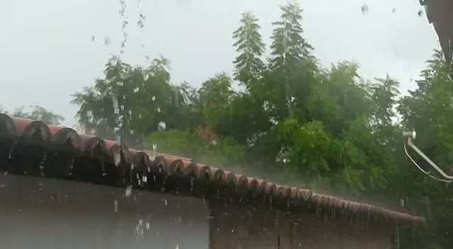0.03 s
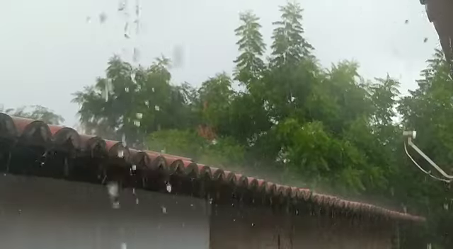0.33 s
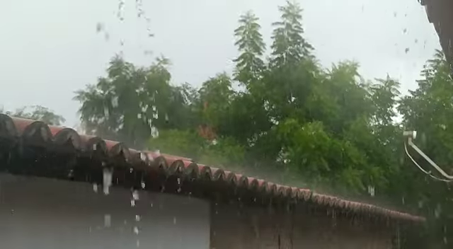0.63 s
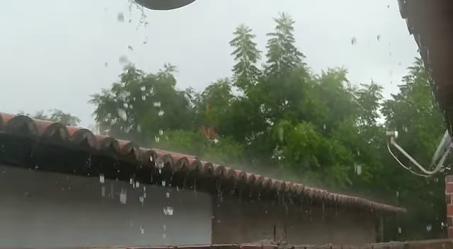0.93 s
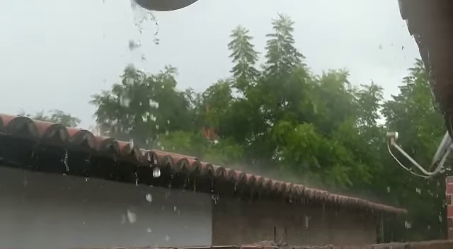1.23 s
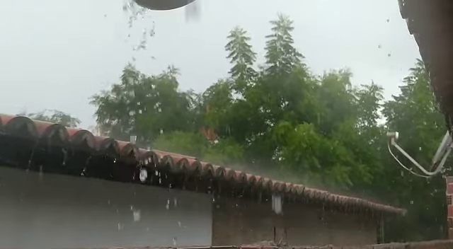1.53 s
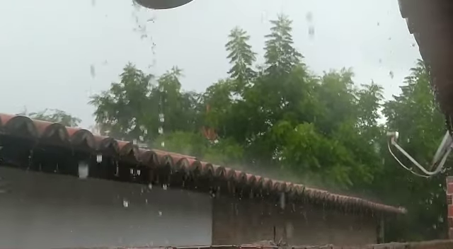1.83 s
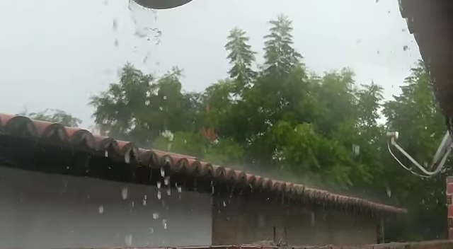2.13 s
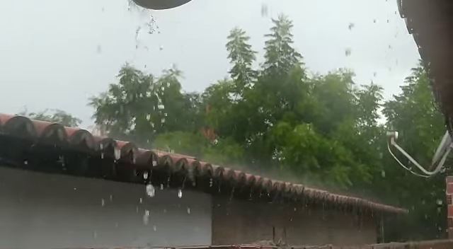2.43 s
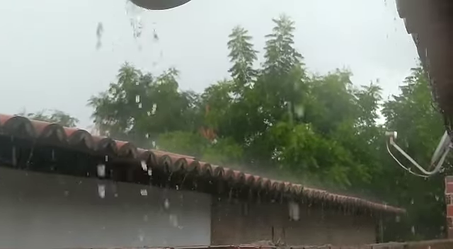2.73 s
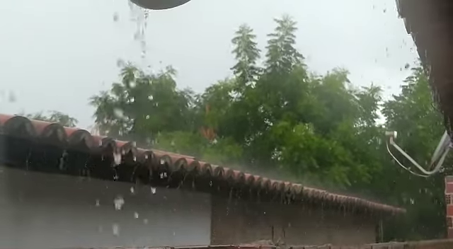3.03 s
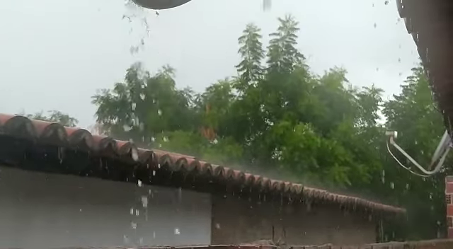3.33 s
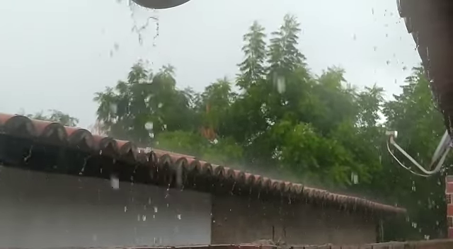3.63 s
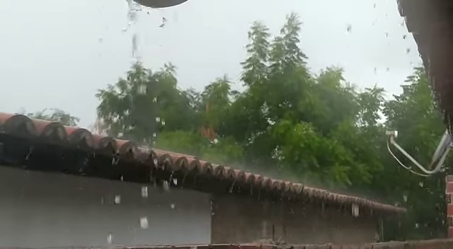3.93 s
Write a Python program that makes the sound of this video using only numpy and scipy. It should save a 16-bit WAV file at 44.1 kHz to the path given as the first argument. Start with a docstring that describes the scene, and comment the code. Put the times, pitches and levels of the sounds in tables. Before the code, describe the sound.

A steady downpour washes over clay tile roofs, heard from shelter beneath the eaves. Close to the microphone, big drops of runoff keep splattering on the wet ground and landing in puddles as the rain eases and swells slightly.

```python
"""Heavy rain from under the eaves of a tiled roof, heard by two spaced microphones bright near 8.5 kHz.
After a third of a second of silence the rain cuts in: countless far impacts merge into a wash, nearer
ones patter and tick, roofs drum at their resonances and tiny bubbles ring. From just after that to the
end, gobs of runoff smack on wet ground and burst into spray, or plop into puddles. The rain eases near
1.3 s and is strongest near 3.25 s; moving air rumbles faintly beneath it."""
import sys
import numpy as np
from scipy import signal
from scipy.fft import rfft, irfft, next_fast_len
from scipy.io import wavfile

SR = 44100
rng = np.random.default_rng(int(sys.argv[2]) if len(sys.argv) > 2 else 0)


def inscribe(sig):
    """Save sig as 16-bit PCM at rate SR to the path in sys.argv[1].

    A 1-D sig is mono; a 2-D sig holds one channel per row.
    Samples are clipped to [-1, 1] before scaling.
    """
    pcm = np.round(np.clip(np.atleast_2d(sig).T, -1, 1) * 32767)
    wavfile.write(sys.argv[1], SR, pcm.astype(np.int16))


N = 176400
TIME = np.arange(N) / SR

# Large gobs striking the ground. Each row: start in seconds, spray level in dB, slap level in dB,
# slap frequency in Hz, rise time in seconds, left minus right level in dB.
GROUND_GOBS = [(.438, -22, -31, 4500, 0.0045, -2), (.682, -19.5, -34, 3480, .0007, -1),
               (.745, -38, -25, 4300, .0034, -1), (.886, -45, -26.5, 2740, 0.0037, 0),
               (.9455, -17.5, -19.5, 4600, 0.0026, 1), (.998, -18.5, -45, 2500, .0011, 0),
               (1.049, -19.5, -32, 5200, .0028, 0), (1.205, -30, -30, 4300, 0.0034, 0),
               (1.388, -24, -25, 4280, 0.0033, 2), (1.415, -38, -25, 4550, 0.0031, -3),
               (1.46, -25, -24, 3000, 0.012, 1), (1.598, -17, -19, 3300, 0.0031, -1.5),
               (1.923, -35, -23.5, 4300, 0.0021, 1), (1.986, -24, -31, 4500, 0.0036, 1),
               (2.023, -23, -24, 3700, 0.0032, -1), (2.095, -22, -30, 3100, 0.0039, -1),
               (2.205, -32, -31, 3320, 0.0096, -3), (2.345, -20.5, -26.5, 2880, 0.0067, 0),
               (2.39, -20.5, -25.5, 4450, 0.0036, 1), (2.502, -21.5, -38, 4500, .001, -1),
               (2.545, -25, -32, 4500, .003, -2), (2.649, -22, -41, 2780, 0.0046, 0),
               (2.757, -25, -25, 4030, .006, 0), (2.888, -36, -26.5, 3650, 0.0037, 0),
               (2.9703, -25, -17.5, 5340, 0.00059, 3), (2.986, -25, -28, 5000, 0.0035, 5),
               (3.008, -23, -23.5, 3300, 0.0061, 3), (3.158, -24, -23, 2630, 0.0085, -1),
               (3.271, -19.5, -25.5, 4900, 0.0034, 0), (3.315, -34, -22, 2950, 0.003, 1.5),
               (3.35, -33, -31, 3900, .004, 0), (3.509, -21.5, -20.5, 2270, 0.0065, -1),
               (3.535, -22, -17, 4500, 0.0017, 1.5), (3.563, -28, -25, 4950, 0.003, 1),
               (3.621, -18, -31, 5200, 0.0099, 1), (3.763, -21.5, -27.5, 2580, 0.0018, 0),
               (3.872, -20, -27, 2390, 0.005, 0), (3.934, -15.5, -25, 3570, 0.0043, 1)]
# Gobs landing in puddles. Each row: start in seconds, level in dB, centre frequency in Hz.
PUDDLE_GOBS = [(.474, -19.5, 1250), (.53, -25.5, 730), (.942, -28, 1200), (1.032, -22, 860),
               (1.065, -26.5, 520), (1.215, -24.5, 670), (1.456, -26, 1190), (1.59, -30, 910),
               (1.875, -29, 820), (2.087, -36, 1300), (2.352, -25, 1140), (2.408, -23.5, 1340),
               (2.465, -25, 1110), (2.545, -23, 660), (2.595, -27, 500), (2.645, -29, 1320),
               (2.785, -24, 1010), (2.822, -24.5, 1200), (2.862, -23.5, 1280), (3.061, -25, 1520),
               (3.155, -24, 1090), (3.182, -22.5, 1070), (3.214, -26, 1000), (3.318, -29, 1400),
               (3.505, -27, 715)]
# Strength of the rain and the lesser runoff. Each row: time in seconds, gain in dB.
RAIN_STRENGTH = [(.35, 0.5), (.5, 1.5), (.63, -0.5), (.8, 2), (1.05, -1), (1.3, -3), (1.5, 1.5), (1.72, 0),
                 (2.2, 0), (2.4, 1), (2.62, -0.5), (2.73, -1), (2.85, 0.5), (3.0, -0.5), (3.25, 2.5),
                 (3.5, 1.5), (3.7, -2), (4, -1.5)]
# Spectra of the far, nearer and closest drops. Each row: frequency in Hz, relative level in dB.
WASH_SPECTRUM = [(25, -12), (60, -9), (130, -9), (200, -4), (320, -2), (600, -5), (900, -3), (1150, -3),
                 (2000, -5), (3500, -8.5), (6000, -8), (10000, -5), (15500, -20)]
PATTER_SPECTRUM = [(60, -14.5), (150, -4), (280, 2), (550, 4), (850, 2), (1150, -6.5), (1800, 0.5),
                   (3000, -11.5), (6000, -26), (15500, -3)]
TICK_SPECTRUM = [(300, -17), (1500, 7.5), (3000, -12), (6000, -23), (9500, 4), (12000, -12), (15500, -7)]
# Normal modes of the roofs. Each row: frequency in Hz, bandwidth in Hz, level in dB.
ROOF_RESONANCES = [(88.8, 8.8, -46.5), (143.7, 13, -50.5), (182.3, 18.6, -46.5), (249.7, 23, -45.5),
                   (296.6, 20, -43.5), (365, 7.2, -45.5), (499, 105, -41), (730.6, 24, -44),
                   (867, 58, -40.5), (1102, 22, -52), (1560, 13, -45.5), (1757, 45, -46.5), (2593, 66, -45)]
# Swell of the lowest roof mode. Each row: time in seconds, gain in dB.
LOWEST_MODE_SWELL = [(.4, 0.5), (.8, -3.5), (1.25, 1.5), (1.6, -10), (2.1, 4), (2.4, -1), (2.9, 4.5),
                     (3.3, -3), (3.7, -2.5)]
# Spectrum of air moving over the microphones. Each row: frequency in Hz, relative level in dB.
DRAUGHT_SPECTRUM = [(20, 3), (45, 4), (90, -7), (160, -13), (300, -25), (1000, -41)]
# Balance curve, of which each side takes a share. Each row: frequency in Hz, leftward bias in dB.
LEFT_BIAS = [(60, 4.5), (130, 0), (300, 3), (700, 3), (2500, 1), (5000, 1), (8500, -2.7), (15000, -2)]
# Frequency response of the microphones. Each row: frequency in Hz, gain in dB.
MICROPHONE_RESPONSE = [(4000, 2.5), (6000, 2.5), (7300, 4), (8500, 8), (9400, 5), (10400, -5),
                       (12000, -4.5), (15000, -8)]

MIC_DELAY_S = .00044  # longest travel time between the two microphones
SPRAY_Q, SLAP_Q, BROAD_Q = 1.76, 1.2, 0.61
SPRAY_HZ, SMACK_HZ = 9050, 5720
HARD_SLAP_DB, HARD_SMACK_DB = -17.5, -22  # slap and smack of a hard gob


def runoff(gobs, fall_s):
    """Impact of a liquid on a solid: each gob smacks the ground, slaps outward and breaks into spray."""
    out = np.zeros((2, N))
    for start_s, spray_db, slap_db, slap_hz, rise_s, pan_db in gobs:
        hardness_db = slap_db - HARD_SLAP_DB
        own_fall_s = fall_s * from_db(-max(hardness_db, 0))  # the hardest spend their water sooner
        smack = splash(SMACK_HZ, BROAD_Q, rise_s, fall_s=0.01, per_s=5600, tail_share=0)
        smack *= from_db(HARD_SMACK_DB + hardness_db)
        spray = from_db(spray_db) * splash(SPRAY_HZ, SPRAY_Q, rise_s, own_fall_s, per_s=4500)
        slap = from_db(slap_db) * splash(slap_hz, SLAP_Q, rise_s, own_fall_s, per_s=6000)
        add(out, start_s, from_db([[pan_db / 2], [-pan_db / 2]]) * (smack + spray + slap))
    return low_pass(out, hz=13000)


def lesser_gobs(count=150, per_s=26, spray_db=-27.5, slap_db=-31.5, spread_db=3,
                slap_hz=3280, spread_octaves=0.71, rise_s=0.011):
    """Random scatter in timing, force and pitch gives the lesser gobs, in rows like GROUND_GOBS."""
    starts = np.cumsum(rng.uniform(.1, 1.9, count)) / per_s
    return [(start_s, spray_db + spread_db * force, slap_db + spread_db * (force + slap) / 2,
             slap_hz * 2 ** (spread_octaves * pitch), rise_s, pan_db)
            for start_s, (force, slap, pitch, pan_db) in zip(starts, rng.standard_normal((count, 4)))]


def puddles():
    """Impact on standing water: the splash is duller, its energy lying at lower frequencies."""
    out = np.zeros((2, N))
    for start_s, db, hz in PUDDLE_GOBS:
        add(out, start_s, from_db(db) * splash(hz, BROAD_Q, rise_s=0.0032, fall_s=0.045, per_s=1800))
    return low_pass(out, hz=3460)


def splash(hz, q, rise_s, fall_s, per_s, tail_share=0.47, tail_s=0.036):
    """Impulse excitation: a burst of droplets drives a broad band and a damped hollow near its pitch."""
    t = TIME[:SR // 6]
    droplets = drops(per_s, spread_db=-1.0, size=len(t))
    since_peak = np.maximum(t - rise_s, 0)
    fall = (1 - tail_share) * np.exp(-since_peak / fall_s)
    tail = tail_share * np.exp(-since_peak / tail_s)  # droplets landing again
    envelope = np.minimum(t / rise_s, 1) * (fall + tail)
    hollow_hz = hz * 2 ** (0.37 * rng.uniform(-1.05, 1))
    hollow = from_db(-5) * resonate(droplets, hollow_hz, q=9.9)
    return envelope * rms_one(resonate(droplets, hz, q) + hollow)


def rain(wash_swing_share=0.85):
    """Superposition: dense far impacts fuse into noise; sparser near drops and gobs stay distinct."""
    strength = from_db(np.interp(TIME, *np.transpose(RAIN_STRENGTH)))
    wash = from_db(-27) * shower(WASH_SPECTRUM, per_s=25000, spread_db=2.5)
    patter = from_db(-31) * shower(PATTER_SPECTRUM, per_s=1500, spread_db=4.0)
    ticks = from_db(-38.5) * shower(TICK_SPECTRUM, per_s=700, spread_db=10.0)
    lesser_runoff = runoff(lesser_gobs(), fall_s=0.028)
    return strength ** wash_swing_share * wash + strength * (patter + ticks + lesser_runoff)


def shower(spectrum, per_s, spread_db):
    """Shot noise: a random stream of like impacts has the spectrum of a single one; unit power."""
    return rms_one(colour(drops(per_s, spread_db), spectrum))


def drops(per_s, spread_db, size=N):
    """Poisson impacts from all sides reach the two microphones at unequal times and levels; unit power."""
    hits = np.flatnonzero(rng.random(size) < per_s / SR)
    force_db = spread_db * np.minimum(rng.exponential(1, size), 4)
    force = (from_db(force_db) * rng.choice([-1, 1], size))[hits]
    lag = np.round(rng.uniform(-1, 1, size) * MIC_DELAY_S * SR).astype(int)[hits]
    side_db = rng.standard_normal(size)[hits]
    left = np.bincount(hits, force * from_db(-side_db), size)
    right = np.bincount((hits + lag) % size, force * from_db(side_db), size)
    return rms_one(np.array([left, right]))


def roofs():
    """Forced vibration: drops keep the roof modes ringing; the lowest one swells and fades."""
    lowest, *higher = [from_db(db) * resonate(drops(per_s=900, spread_db=3.5), hz, hz / width_hz)
                       for hz, width_hz, db in ROOF_RESONANCES]
    swell = from_db(np.interp(TIME, *np.transpose(LOWEST_MODE_SWELL)))
    return lowest * swell + sum(higher)


def bubbles(count=2400, per_s=240, low_hz=1228, high_hz=10220, ring_cycles=120, glide=0.13):
    """Bubble resonance: air trapped by drops on water rings briefly, rising a little in pitch."""
    out = np.zeros((2, N))
    starts = np.cumsum(rng.exponential(1, count)) / per_s
    for start_s, (pitch, faintness, side) in zip(starts, rng.random((count, 3))):
        if start_s < N / SR:
            hz = low_hz * (high_hz / low_hz) ** pitch
            delay_s = MIC_DELAY_S * np.array([[side], [1 - side]])
            cycles = hz * np.maximum(TIME[:SR // 25] - delay_s, 0)
            age = cycles / ring_cycles
            envelope = from_db(-4.0 * np.log(faintness + 0.028) - 60 * age)
            add(out, start_s, envelope * np.sin(2 * np.pi * cycles * (1 + glide * age)))
    return from_db(-39) * rms_one(out)


def draught():
    """Pressure fluctuations of moving air give each microphone a faint rumble of its own."""
    return from_db(-51.5) * rms_one(colour(rng.standard_normal((2, N)), DRAUGHT_SPECTRUM))


def resonate(x, hz, q):
    """Response of one damped resonator of quality factor q; unit power."""
    resonator = signal.iirpeak(min(hz, .4 * SR), max(q, .5), fs=SR)
    return rms_one(signal.lfilter(*resonator, x + 1e-18))


def colour(x, curve, share=1):
    """Minimum-phase filtering by a curve of frequency in Hz and gain in dB, the dB scaled by share."""
    size = next_fast_len(N + SR // 4, True) * 2
    hz, db = np.transpose(curve)
    bin_hz = np.maximum(np.arange(size // 2 + 1) * SR / size, 1)
    gain = from_db(share * np.interp(np.log(bin_hz), np.log(hz), db))
    cepstrum = irfft(np.log(gain))
    cepstrum[1:size // 2] *= 2  # folding onto positive time makes the filter causal
    cepstrum[size // 2 + 1:] = 0
    return irfft(rfft(x, size) * np.exp(rfft(cepstrum)))[..., :N]


def low_pass(x, hz):
    """Second-order attenuation above a corner frequency."""
    return signal.sosfilt(signal.butter(2, hz, fs=SR, output="sos"), x + 1e-18)


def add(out, start_s, sound):
    """Superpose a sound from its start time on."""
    i = int(start_s * SR)
    out[:, i:i + sound.shape[1]] += sound[:, :max(N - i, 0)]


def from_db(db):
    """Amplitude ratio of a level in decibels."""
    return 10 ** (np.asarray(db) / 20)


def rms_one(x):
    """Normalisation to unit power."""
    return x / np.sqrt(np.mean(x ** 2) + 1e-20)


def scene():
    """Sound pressures add; level differences place the low sounds to the left, the spray to the right."""
    air = draught()
    left, right = roofs() + bubbles() + puddles() + runoff(GROUND_GOBS, fall_s=0.027) + rain()
    return air + np.array([colour(left, LEFT_BIAS, share=0.26), colour(right, LEFT_BIAS, share=-0.3)])


def record(dry, start_s=.347, fade_in_s=0.0051, cutoff_hz=15700):
    """Transduction: the microphones colour the sound, which cuts in, is clipped and is band-limited."""
    gate = np.clip((TIME - start_s) / fade_in_s, 0, 1)
    heard = colour(dry, MICROPHONE_RESPONSE) * gate
    top_cut = signal.ellip(12, .1, 90, cutoff_hz, fs=SR, output="sos")
    return signal.sosfilt(top_cut, np.clip(heard, -1, 1))


dry = scene()
out = record(dry)
inscribe(out)
```